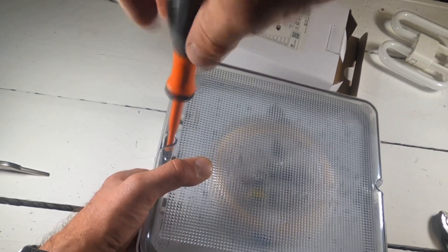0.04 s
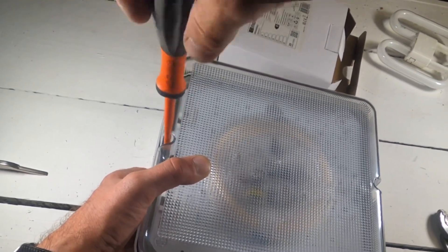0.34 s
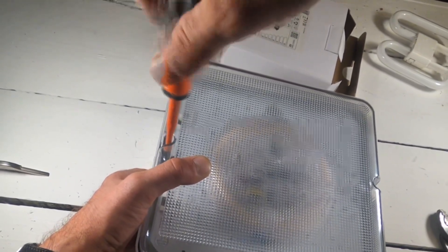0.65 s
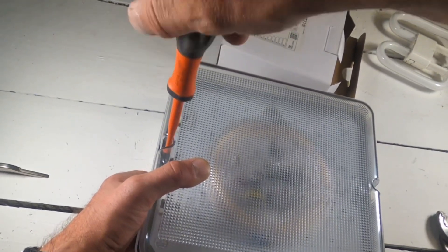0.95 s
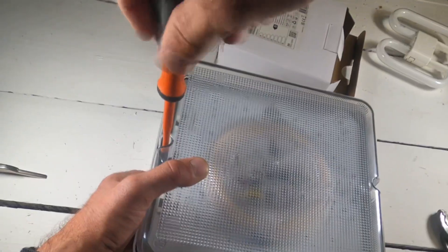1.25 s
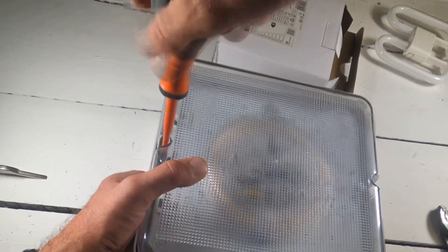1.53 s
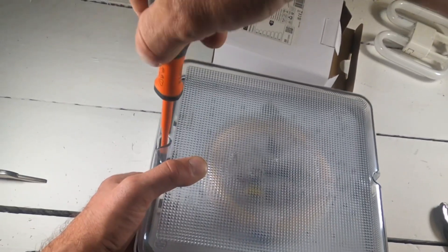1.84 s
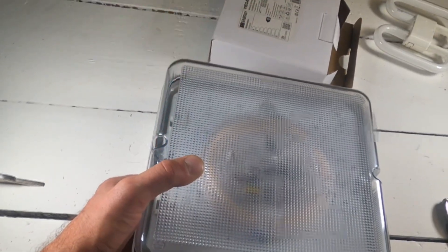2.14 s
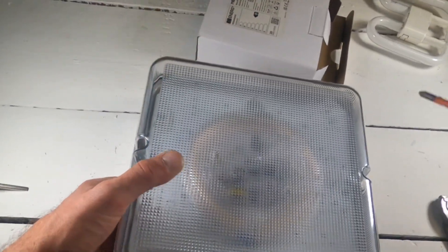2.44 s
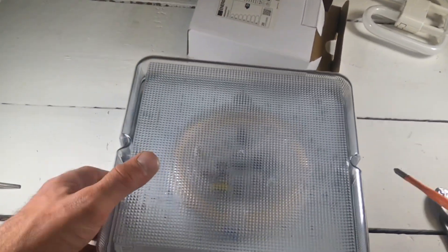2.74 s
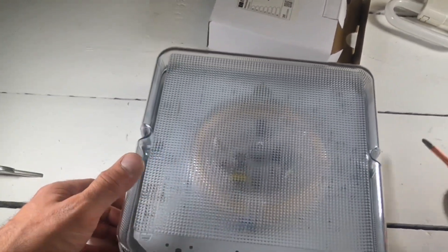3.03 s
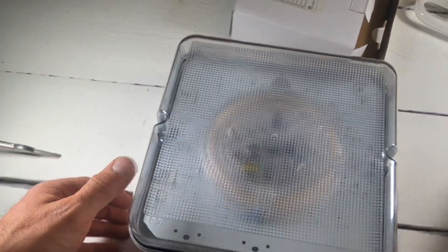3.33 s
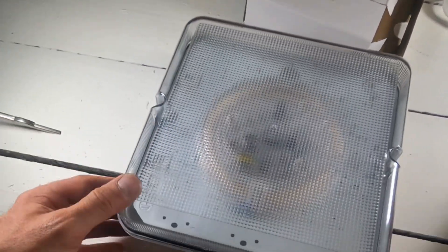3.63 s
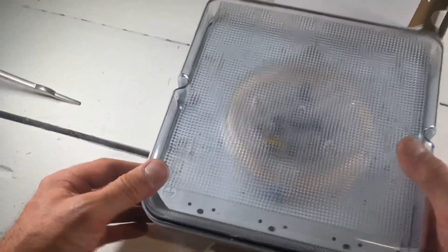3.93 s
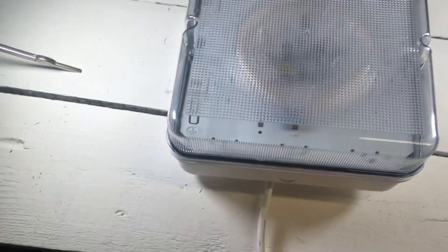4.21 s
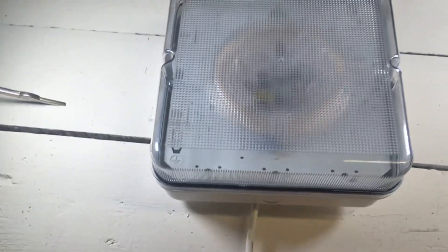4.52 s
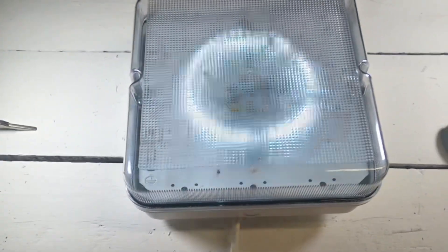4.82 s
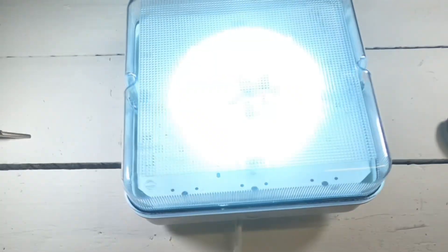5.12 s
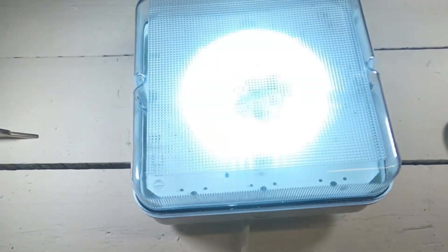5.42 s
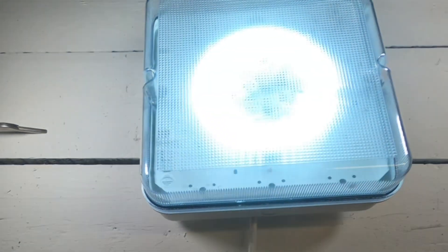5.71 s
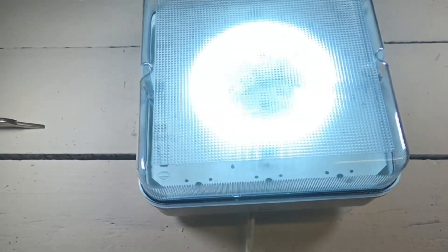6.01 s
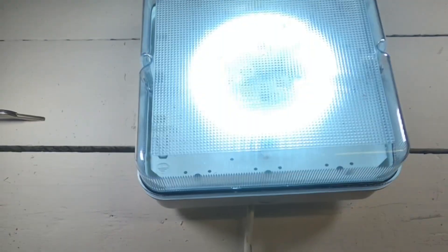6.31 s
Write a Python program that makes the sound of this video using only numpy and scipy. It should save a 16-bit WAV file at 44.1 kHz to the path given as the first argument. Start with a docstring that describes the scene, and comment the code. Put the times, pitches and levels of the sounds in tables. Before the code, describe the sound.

For the first two seconds, a hand screwdriver turns a screw into a lamp's plastic lid. The tip clacks irregularly in the screw head over a faint, grainy rasp, with a few soft low thumps as the lamp rocks. From about 1.4 seconds the screw creaks, with tiny squeaks around 1.6 and 1.7. Between 2.2 and 3.1 seconds the lamp bumps and slides on a wooden bench. At about 3.5 the screwdriver drops, its shaft bouncing and its handle giving one thud, the loudest sound. More bumps and short scrapes follow, stopping abruptly at 4.1. A switch snaps at 4.6, with light finger rubs and taps on its plate, and a second snaps at 5.1. Faint swells of hiss and low room noise remain until about 6.5 seconds. Everything sounds close, in a small workshop with a short, soft echo.

```python
"""At a wooden bench in a small workshop, a hand screwdriver drives a screw into a lamp's plastic lid.
The thread rasps, the tip clacks in the screw head, and the screw creaks and squeaks as it tightens.
The lamp rocks, bumps and slides on the boards, a soft hiss comes and goes, and the screwdriver drops.
The knocking stops abruptly, then two switches snap. Each knock is a burst of noise plus the
fading notes of the struck object; each rub is a swell of grainy hiss."""
import sys
import numpy as np
from scipy import signal
from scipy.fft import rfft, irfft, next_fast_len
from scipy.io import wavfile
from scipy.ndimage import uniform_filter1d

SR = 44100
rng = np.random.default_rng(int(sys.argv[2]) if len(sys.argv) > 2 else 0)


def bounce(signal):
    """Save signal as a 16-bit WAV file at the path given by the first command-line argument."""
    frames = np.transpose(np.atleast_2d(signal))
    limited = np.clip(frames, -1, 1)
    pcm = np.round(limited * 32767).astype(np.int16)
    wavfile.write(sys.argv[1], SR, pcm)


N = 280424

# Knocks; a harder one sounds brighter (t/s, level/dB, hardness/dB)
BIT_CLACKS = [(.014, -42.5, 4.5), (.110, -46, -2), (.124, -46.5, 5.5), (.159, -29.5, 15.5),
              (.249, -39.5, 14), (.255, -22, 0.5), (.329, -46, -0.5), (.349, -49.5, -5), (.429, -50.5, -8),
              (.485, -26, 9), (.499, -23, 9.5), (.686, -51, 1.5), (.743, -40.5, 8.5), (.759, -41.5, 0),
              (.797, -36, -44), (.81, -34, 9.5), (.925, -39, -2), (.974, -36.5, 0), (1.094, -31.5, 14),
              (1.116, -56, -7), (1.188, -45.5, -2), (1.232, -39.5, 2.5), (1.251, -33.5, 3), (1.601, -34, 1),
              (1.707, -40, 4), (1.73, -33, 6.5), (1.971, -33, 4.5)]
SCREW_CREAKS = [(1.359, -41, -22.5), (1.4, -32, 1), (1.454, -29, -6), (1.567, -30, 0),
                (1.828, -31.5, -13.5), (1.841, -37.5, -1.5), (1.856, -33, -13), (1.876, -32, -10),
                (1.937, -37.5, -3)]
SHAFT_BOUNCES = [(3.4866, -34.5, 16), (3.548, -31, 3), (3.591, -35.5, 10), (3.794, -45.5, -5),
                 (4.087, -46, -2)]
HANDLE_FALL = [(3.582, -17, -21)]
FINGER_TAPS = [(4.318, -68.5, 8.5), (4.516, -83.5, 28), (4.532, -60.5, 12.5), (4.562, -75, 22),
               (4.822, -51.5, 5.5), (4.853, -83, 26), (4.928, -76.5, 26), (5.139, -56.5, 20),
               (5.404, -65, -16.5), (6.067, -79, 19.5)]
# The lamp meets the bench (t/s, level/dB, hardness/dB, extra thump from its weight/dB)
BENCH_BUMPS = [(2.241, -36, -6, -4), (2.338, -52, -20, 5.5), (2.381, -35.5, -15, -6.5),
               (2.692, -44, 11.5, 9), (2.775, -25.5, -2.5, -18), (2.863, -39.5, -2.5, -1),
               (2.961, -24.5, -1.5, 9), (3.037, -41, 16.5, 14), (3.078, -38, -3, 18.5),
               (3.118, -48, 8.5, 12.5), (3.785, -48.5, -11, 4.5), (3.835, -53.5, -11, 10.5),
               (3.974, -49, 11.5, 8), (4.013, -28.5, 1, 12), (4.038, -34.5, 7.5, 1.5)]
# Switch flips (t/s, rocker level/dB, contact delay/s, contact level/dB, contact hardness/dB)
SWITCH_THROWS = [(4.6045, -34, 0.00179, -27, 1), (5.1443, -27.5, 0.0068, -26.5, -5)]
ROCKS = [(0.557, -31.5), (0.881, -40.5), (0.965, -38), (1.325, -28.5), (1.803, -24), (3.602, -33.5)]  # the hand rocks the lamp (t/s, level/dB)
TWISTS = [(0.016, -62), (0.228, -57), (0.343, -61), (0.446, -69.5), (0.58, -55.5), (0.814, -59.5),
          (0.939, -52.5), (1.124, -58), (1.401, -67), (1.633, -61), (1.739, -62)]  # turns of the wrist (middle t/s, level/dB)
# Rubs and swells of hiss (middle t/s, half length/s, level/dB)
REGRIPS = [(0.47, 0.073, -66), (0.66, 0.078, -66), (1.178, 0.077, -68), (1.42, 0.093, -67)]
HISS_SWELLS = [(2.56, 0.14, -69), (4.27, 0.057, -68.5), (5.71, 0.12, -65), (6.3, 0.16, -64.5)]
SLIDES = [(2.75, 0.28, -60), (2.98, 0.15, -59.5), (3.36, 0.032, -63), (3.71, 0.024, -59), (3.82, 0.02, -59),
          (3.945, 0.036, -53.5), (4.06, 0.034, -46.5)]
PLATE_RUBS = [(4.575, 0.036, -54), (4.68, 0.037, -54.5), (4.81, 0.075, -59), (4.95, 0.074, -68)]
# Plastic squeaks; t60 is the time to fade by 60 dB (t/s, f/Hz, level/dB, t60/s)
SQUEAKS = [(1.598, 1120, -33, 0.1), (1.64, 2160, -59, 0.46), (1.733, 1175, -35, 0.056)]

# Modes: the notes an object rings with when struck (f/Hz, level/dB, t60/s)
LID_MODES = [(157.3, -1.5, 0.25), (306, -7, 0.16), (420.3, -3.5, 0.11), (456.3, 11.5, 0.06),
             (645.5, -5.5, 0.16), (981, -3.5, 0.091), (1027, 7, 0.045), (1127, -5.5, 0.13),
             (1425, -9, 0.13), (2051, 0.5, 0.035)]
BENCH_MODES = [(157.2, 7, 0.2), (217.8, 2, 0.17), (437, 0, 0.085), (545, -11, 0.13), (682, -15.5, 0.24),
               (820, -20, 0.19), (1120, -9.5, 0.16), (1383, 0.5, 0.069)]
SHAFT_MODES = [(220, -6, 0.26), (268, -3, 0.039), (396, -3, 0.059), (478, -5.5, 0.14), (1002, 12, 0.14),
               (1248, -8, 0.38), (1436, 1.5, 0.069), (1630, -17, 0.037), (2110, -7, 0.13),
               (2530, -12.5, 0.1), (3570, 15, 0.013)]
HANDLE_MODES = [(154, -4, 0.38), (227, -10, 0.41), (303, 1, 0.13), (409, -5.5, 0.23), (493, -3.5, 0.085),
                (647, -5, 0.12), (823, -5, 0.14)]
FIRST_SWITCH_MODES = [(576, 0, 0.065), (685, 7.5, 0.11), (814, 0, 0.15), (933, -12.5, 0.133),
                      (1470, -6, 0.2), (1980, -4, 0.13), (3330, 26.5, 0.0073), (4380, -18.5, 0.12)]
SECOND_SWITCH_MODES = [(619, -2, 0.16), (677, 6, 0.081), (790, -2.5, 0.12), (1120, -5, 0.13),
                       (1254, 15, 0.036)]

# Colours: how strong each hiss or crack is from bass to treble (f/Hz, level/dB)
AIR_COLOUR = [(20, -11), (50, -3), (100, -30), (160, 0), (300, -4.5), (450, -14), (1350, -14.5),
              (1750, -23.5), (7000, -33), (11000, -48), (16000, -63.5)]
GRIND_COLOUR = [(500, 30), (2800, 8), (5200, 4.5), (7200, 1), (10000, -5.5), (13500, -10), (16000, -47)]
HISS_COLOUR = [(200, -5), (1100, -2.5), (2000, -4), (7300, -9.5), (10000, -21), (13500, -26.5),
               (16000, -56)]
SLIDE_COLOUR = [(100, -9.5), (300, 9.5), (1200, 8), (2300, 7.5), (3100, -0.5), (4300, 0), (5400, -7),
                (7200, -10.5), (8600, -18), (16000, -37)]
PLATE_COLOUR = [(400, -6.5), (820, 3), (1900, 2.5), (2700, -2.5), (4450, -0.5), (5400, -6), (7300, -14),
                (8600, -23), (16000, -37)]
CRACK = [(25, -37.5), (112, -14), (165, 9), (250, 1), (450, -2), (1000, -4.5), (2500, -12), (5000, -22.5),
         (7400, -29), (8600, -32.5), (16000, -62)]
SHAFT_CRACK = [(60, -28.5), (220, 8.5), (480, 3.5), (620, -15), (830, -16), (1020, 6.5), (1700, -9.5),
               (2300, -2.5), (3100, -13.5), (3600, -9.5), (4500, -13), (7400, -19.5), (16000, -66.5)]
FIRST_SWITCH_CRACK = [(60, -42), (370, -14), (680, 6.5), (1150, -6.5), (1500, -4.5), (2450, -4),
                      (3250, 3.5), (3900, -6), (7200, -9), (8600, -19), (16000, -41)]
SECOND_SWITCH_CRACK = [(60, -34.5), (400, -8.5), (650, 0.5), (1250, 5.5), (1700, -2.5), (5200, -2),
                       (7200, -5.5), (8600, -21.5), (16000, -44)]

# Borders of a knock's four bands, low to high: thump, body, ring, snap (f/Hz)
BAND_EDGES = [90, 300, 850, 2500, 9000]
# Tone of a knock; the rows are thump, ring and snap
# (level above the body/dB, change per dB of level/dB, change per dB of hardness/dB)
LID_TONE = [(-8.5, -0.96, 0.93), (-17, -0.11, 0.8565), (-31, 0, 1)]
CREAK_TONE = [(-9.5, 0.0047, 0.092), (-20, 0, 1), (-40.5, 0.0057, 1)]
BENCH_TONE = [(-0.5, 0, 0.011), (-10.5, 0.1, 1), (-30.5, 0.82, 0.73)]
TOOL_TONE = [(0.5, 0, 0.51), (3, 0, 0.71), (-16, 0, 1)]
SWITCH_TONE = [(-20, 0, 0.55), (-6.5, 0, 1), (-10, 0, 1)]

ROOM_T60 = [(150, 0.32), (400, 0.26), (3000, 0.17), (7000, 0.14), (14000, 0.078)]  # how long the room echoes (f/Hz, t60/s)
MIC_BALANCE = [(60, 5), (200, 0.5), (1000, -0.3), (2800, -1.5), (7500, -1.5), (10000, 12), (12500, -6.5)]  # how the two microphones differ (f/Hz, left minus right/dB)


def amp(db):
    """Turns decibels into a multiplier."""
    return 10 ** (np.asarray(db) / 20)


def evened(x):
    """Scales a signal to an average (rms) size of 1."""
    return x / np.sqrt(np.mean(x ** 2) + 1e-20)


def read(points, hz):
    """Looks up a frequency between the rows of a table, on a log scale."""
    f, value = np.transpose(points)
    return np.interp(np.log(hz + 1), np.log(f + 1), value)


def add(mix, s, sound):
    """Mixes in a stereo sound at s seconds."""
    part = mix[:, max(round(s * SR), 0):][:, :sound.shape[1]]
    part += sound[:, :part.shape[1]]


def coloured(x, points, size=4096):
    """Gives a sound a colour, with a filter that never rings early (minimum phase)."""
    log_gain = np.log(amp(read(points, abs(np.fft.fftfreq(size, 1 / SR)))))
    taps = np.fft.ifft(np.exp(np.conj(signal.hilbert(log_gain)))).real[:size // 2]
    return signal.fftconvolve(x, taps[None], axes=1)[:, :x.shape[1]]


def noise(n, width):
    """Stereo hiss; width sets how much left and right differ, most of all in the treble."""
    mid, side = rng.standard_normal((2, n))
    side = width * signal.lfilter([2, -1.3], [1], side)
    return evened(np.array([mid + side, mid - side]))


def wobble(n, size):
    """A random wander, smoothed over size samples."""
    return evened(uniform_filter1d(rng.standard_normal(n), size))


def band_db(x, edges):
    """Level of a sound in each frequency band."""
    size = 2 * next_fast_len(x.shape[1])
    power = abs(rfft(x.mean(0), size)) ** 2 * 2 / (size * x.shape[1])
    hz = np.fft.rfftfreq(size, 1 / SR)
    bands = np.array([power[(hz >= a) & (hz < b)].sum() for a, b in zip(edges, edges[1:])])
    return 10 * np.log10(bands + 1e-20)


def still_room(air_db=-63, hum_db=-69, hum_hz=157):
    """Faint room noise and the room's one low note."""
    air = evened(coloured(noise(N, 0.93), AIR_COLOUR))
    peak = signal.iirpeak(hum_hz, 6, fs=SR)
    hum = signal.lfilter(*peak, signal.lfilter(*peak, rng.standard_normal(N)))
    return amp(air_db) * air + amp(hum_db) * evened(hum)


def friction(strokes, colour, grain_db, grains_per_s, judder_db, width):
    """Hiss with tiny catches in it, like sliding surfaces; each stroke swells, shakes and fades."""
    t = np.arange(N) / SR
    catches = (rng.random(N) < grains_per_s / SR) * amp(3.5 * np.minimum(rng.exponential(1, N), 4))
    grains = evened(catches * rng.choice([-1, 1], N))
    rub = coloured(noise(N, width) + amp(grain_db) * grains, colour)
    judder = amp(judder_db * wobble(N, 400))
    push = np.sqrt(sum(amp(db) ** 2 * np.exp(-((t - s) / half) ** 2) for s, half, db in strokes))
    return rub * judder * push / amp(band_db(rub, [1500, 7000]))


def thread_rasp(twist_half_s=0.022):
    """The thread rasps in the plastic; between twists the palm slides to a new grip."""
    strokes = [(s, twist_half_s, db) for s, db in TWISTS] + REGRIPS
    return friction(strokes, GRIND_COLOUR, grain_db=-11.5, grains_per_s=550, judder_db=1.8, width=0.16)


def room_echo(t):
    """The workshop's soft echo, whose treble dies first."""
    hz, when, spectrum = signal.stft(noise(len(t), 0.45), SR, nperseg=256)
    fade = amp(-60 * when / read(ROOM_T60, hz)[:, None])
    tail = signal.istft(spectrum * fade, SR, nperseg=256)[1][:, :len(t)]
    return evened(tail * (1 - np.exp(-t / 0.0062)))


def knocks(rows, tone, modes, colour, tick_s, tick_db, crack_db, crack_t60, room_db, detune,
           rise_s=0.0035, usual_db=-35):
    """Each knock is a tick, a noisy crack, ringing notes and an echo; level and hardness set its tone."""
    out, t = np.zeros((2, N)), np.arange(SR * 2 // 5) / SR
    hz, db, t60 = np.transpose(modes)[:, :, None]
    centres = np.sqrt(np.multiply(BAND_EDGES[1:], BAND_EDGES[:-1]))
    attack = SR * 3 // 100
    for s, level_db, hardness_db, *weight_db in rows:
        # the grip and the spot that is hit change the notes a little each time
        shift, strength = rng.standard_normal((2, len(modes), 1))
        waves = np.sin(2 * np.pi * hz * (1 + detune * shift) * t)
        notes = (amp(db + 2 * strength - 60 * t / t60) * waves).sum(0)
        notes *= 1 - np.exp(-t / rise_s)  # the object takes a moment to move
        tick = evened(noise(len(t), 0.31) * t * np.exp(-t / tick_s))
        crack = evened(noise(len(t), 0.28) * amp(-60 * t / crack_t60) * (1 - np.exp(-t / 0.003)))
        contact = amp(tick_db) * tick + amp(crack_db) * crack + amp(room_db) * room_echo(t)
        knock = evened(notes) + contact.std() * evened(coloured(contact, colour))
        # turn each band up or down so the knock starts with the wanted tone
        thump, ring, snap = np.dot(tone, [1, level_db - usual_db, hardness_db])
        wanted_db = level_db + np.array([thump + sum(weight_db), 0, ring, snap])
        gain_db = wanted_db - band_db(knock[:, :attack], BAND_EDGES)
        add(out, s, coloured(knock, np.column_stack([centres, gain_db])))
    return out


def bit_clacks():
    """The screwdriver's tip slips and drops back into the screw head, making the lid ring."""
    return knocks(BIT_CLACKS, LID_TONE, LID_MODES, CRACK, tick_s=0.00041, tick_db=-9,
                  crack_db=-5.5, crack_t60=0.03, room_db=-11.5, detune=0.012)


def rocking(hz=77, t60=0.18):
    """Soft, low pushes of the lamp against the springy boards."""
    out, t = np.zeros((2, N)), np.arange(SR // 3) / SR
    swell = (1 - np.exp(-(t / 0.014) ** 2)) * amp(-60 * t / t60)
    for s, db in ROCKS:
        cycles = hz * (1 + 0.015 * rng.standard_normal()) * t
        add(out, s, np.tile(amp(db) * swell / swell.max() * np.sin(2 * np.pi * cycles), (2, 1)))
    return out


def screw_creaks():
    """The tightening screw ticks dully; under a pressing hand the lid rings half as long."""
    damped = [(hz, db, t60 / 2) for hz, db, t60 in LID_MODES]
    return knocks(SCREW_CREAKS, CREAK_TONE, damped, CRACK, tick_s=0.00035, tick_db=-2.5,
                  crack_db=3.5, crack_t60=0.12, room_db=-8, detune=0.04, rise_s=0.0025)


def squeaks(waver=0.0077):
    """Short, unsteady tones of plastic sticking and slipping."""
    out, t = np.zeros((2, N)), np.arange(SR // 5) / SR
    for s, hz, db, t60 in SQUEAKS:
        pitch = hz * (1 + waver * wobble(len(t), 200))
        loudness = amp(db - 60 * t / t60) * (1 - np.exp(-t / 0.0011))
        add(out, s, np.tile(loudness * np.sin(2 * np.pi * np.cumsum(pitch) / SR), (2, 1)))
    return out


def bench_bumps():
    """The lamp knocks on the boards as it is let go, tilted and set down."""
    return knocks(BENCH_BUMPS, BENCH_TONE, BENCH_MODES, CRACK, tick_s=0.0012, tick_db=-3.5,
                  crack_db=-1, crack_t60=0.048, room_db=-7.5, detune=0.022)


def soft_hiss():
    """Faint swells of soft, airy hiss."""
    return friction(HISS_SWELLS, HISS_COLOUR, grain_db=-13, grains_per_s=83, judder_db=1.67, width=0.3)


def sliding():
    """Hands and lamp slide over plastic and wood."""
    return friction(SLIDES, SLIDE_COLOUR, grain_db=-15, grains_per_s=48, judder_db=3, width=0.41)


def dropped_screwdriver():
    """The shaft lands first, bounces and rattles; the handle thuds once on the boards."""
    shaft = knocks(SHAFT_BOUNCES, TOOL_TONE, SHAFT_MODES, SHAFT_CRACK, tick_s=0.00069, tick_db=-4,
                   crack_db=-7.5, crack_t60=0.07, room_db=-4.5, detune=0.001, rise_s=0.0011)
    handle = knocks(HANDLE_FALL, TOOL_TONE, HANDLE_MODES, CRACK, tick_s=0.001, tick_db=-2,
                    crack_db=-7, crack_t60=0.06, room_db=-5.5, detune=0.0025, rise_s=0.00056)
    return shaft + handle


def switches(rocker_hardness_db=3, lowest_hz=150):
    """Each switch knocks twice: its rocker tips, then its contact shuts. Fingers tap the first one."""
    out = np.zeros((2, N))
    first = (FIRST_SWITCH_MODES, FIRST_SWITCH_CRACK, FINGER_TAPS)
    second = (SECOND_SWITCH_MODES, SECOND_SWITCH_CRACK, [])
    for (s, db, lag_s, *contact), (modes, colour, taps) in zip(SWITCH_THROWS, (first, second)):
        rows = [(s, db, rocker_hardness_db), (s + lag_s, *contact)] + taps
        out += knocks(rows, SWITCH_TONE, modes, colour, tick_s=0.00042, tick_db=5,
                      crack_db=-3.5, crack_t60=0.035, room_db=-9, detune=0.0041, rise_s=0.00064)
    # so small a plate gives off no bass
    return signal.sosfilt(signal.butter(2, lowest_hz, "highpass", fs=SR, output="sos"), out)


def plate_rubs(lead_s=0.0046, half_s=0.0067, scrape_db=-42.5, ring_db=4):
    """Fingers rub the hollow switch plate and each rocker scrapes before tipping; the plate rings along."""
    strokes = PLATE_RUBS + [(s - lead_s, half_s, scrape_db) for s, *_ in SWITCH_THROWS]
    rub = friction(strokes, PLATE_COLOUR, grain_db=-6.5, grains_per_s=130, judder_db=3, width=0.76)
    peaks = [signal.iirpeak(hz, hz * t60 * np.pi / np.log(1000), fs=SR)
             for hz, _, t60 in FIRST_SWITCH_MODES if t60 > 0.1]  # only the longer notes
    return rub + amp(ring_db) * sum(signal.lfilter(*peak, rub) for peak in peaks)


def scene(work_ends_s=4.1225):
    """Work on the bench, then the switches, over quiet rubbing and room noise."""
    work = bit_clacks() + rocking() + screw_creaks() + squeaks() + bench_bumps() + dropped_screwdriver()
    work *= np.arange(N) < work_ends_s * SR
    return still_room() + thread_rasp() + work + soft_hiss() + sliding() + switches() + plate_rubs()


def record(dry, lag_s=0.000044, max_radians=1.3, top_hz=15800):
    """Two close microphones: the left hears first and has a treble peak. Both lose the very top."""
    hz = np.fft.rfftfreq(N, 1 / SR)
    phase = max_radians * np.tanh(2 * np.pi * hz * lag_s / max_radians)
    lean = amp(read(MIC_BALANCE, hz) / 2) * np.exp(0.5j * phase)
    mics = irfft(rfft(dry) * np.array([lean, 1 / lean]), N)
    lowpass = signal.firwin(255, top_hz, window=("kaiser", 9), fs=SR)
    return signal.oaconvolve(mics, lowpass[None], "same")


dry = scene()
out = record(dry)
bounce(out)
```